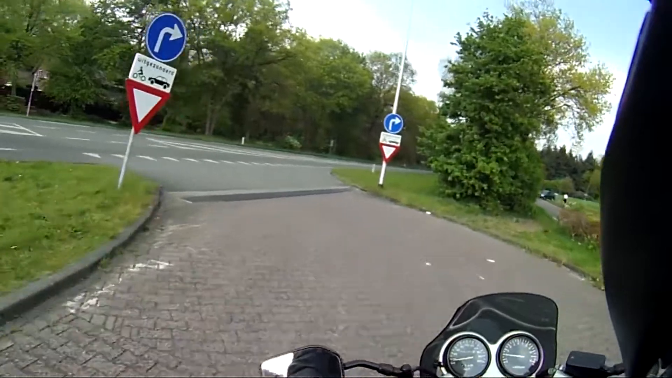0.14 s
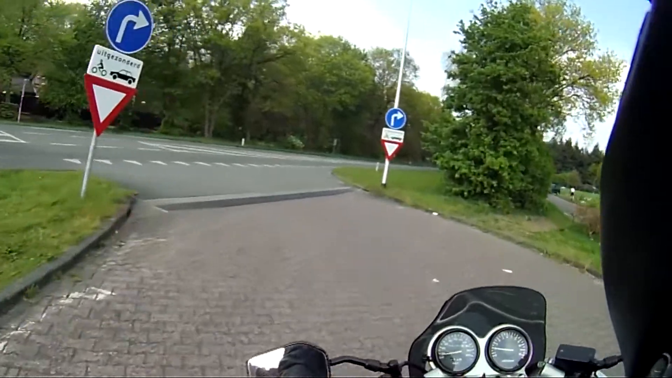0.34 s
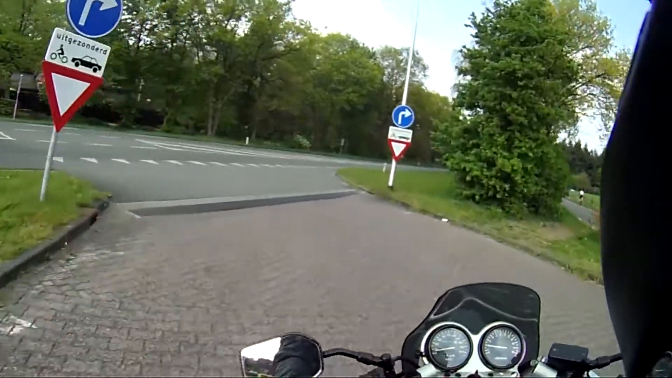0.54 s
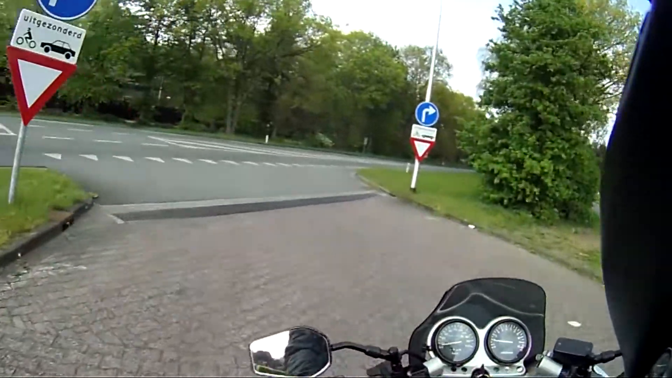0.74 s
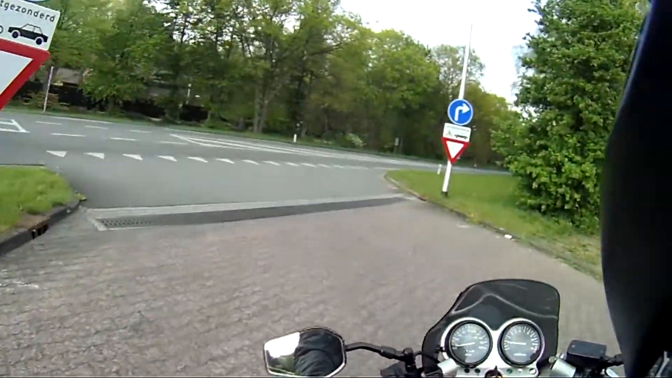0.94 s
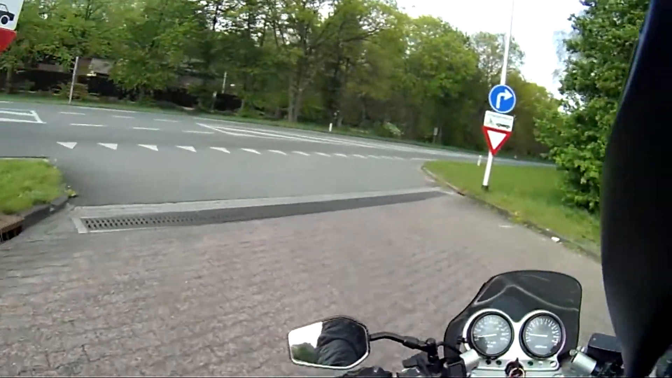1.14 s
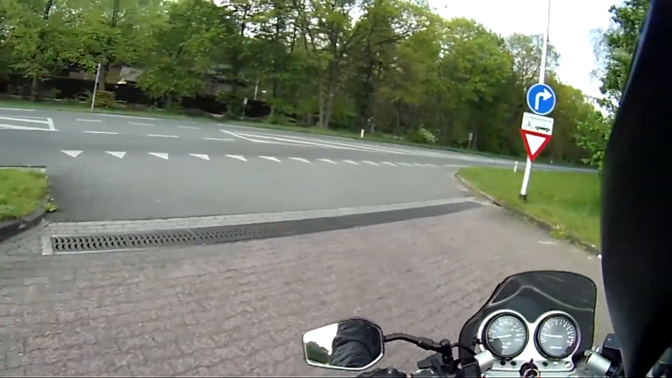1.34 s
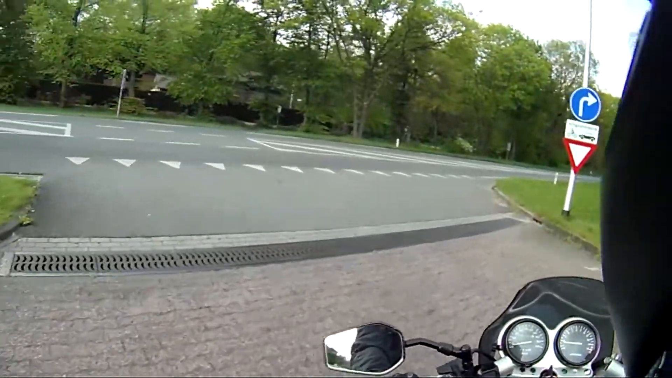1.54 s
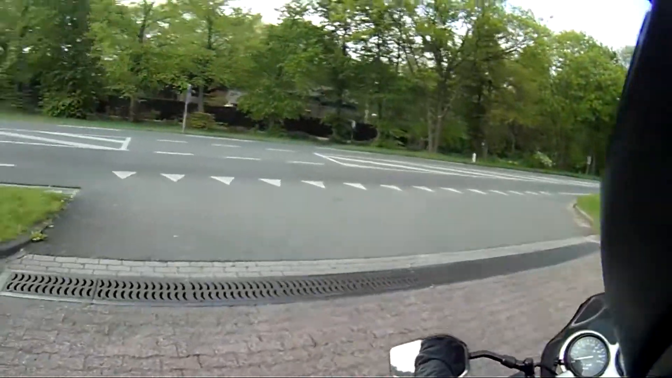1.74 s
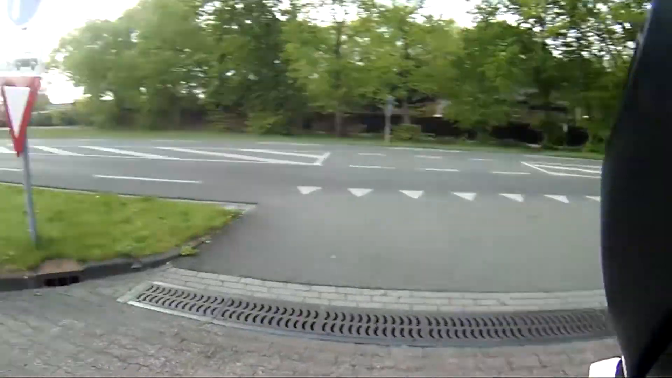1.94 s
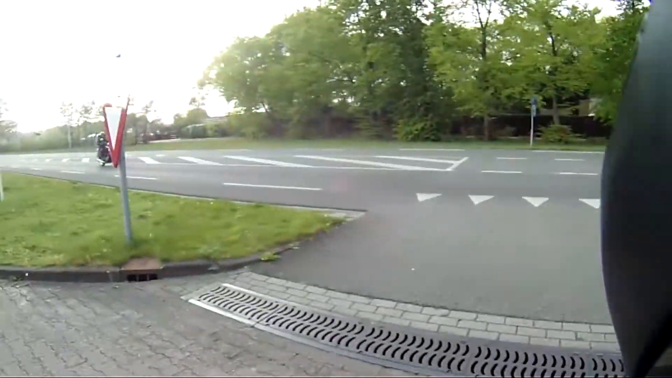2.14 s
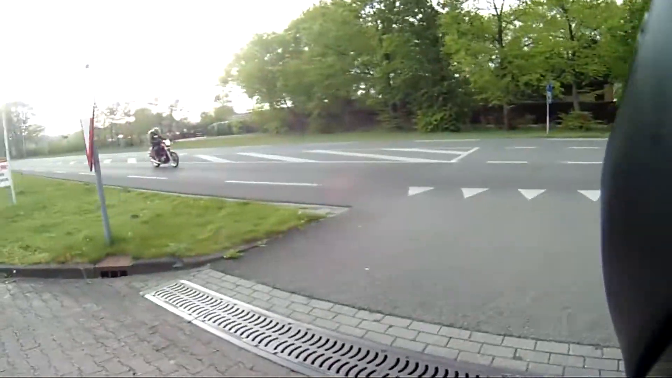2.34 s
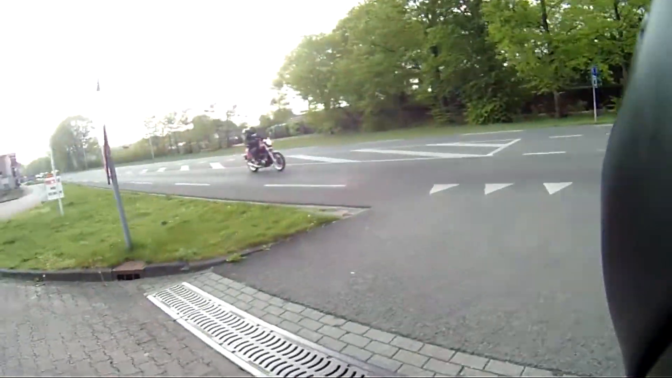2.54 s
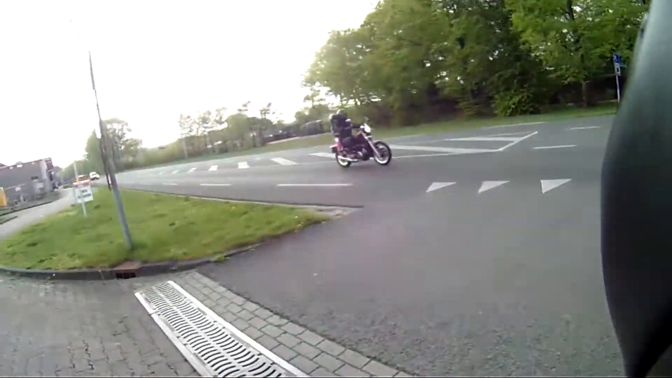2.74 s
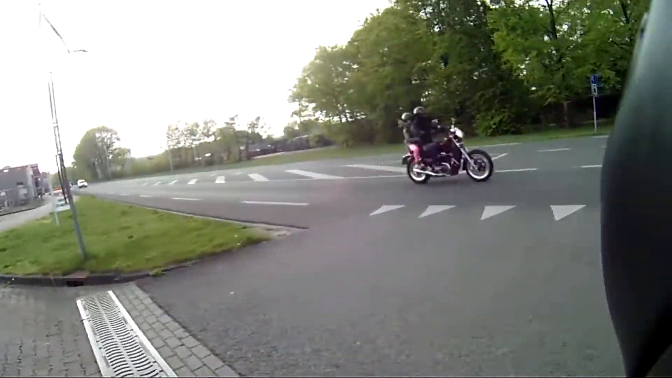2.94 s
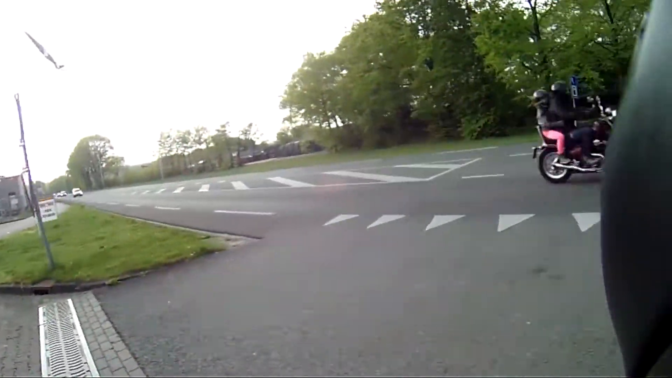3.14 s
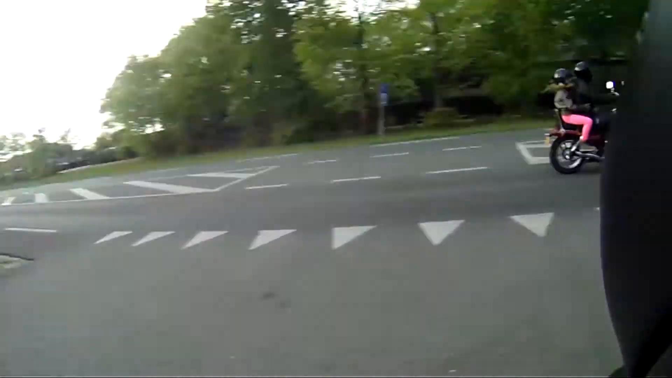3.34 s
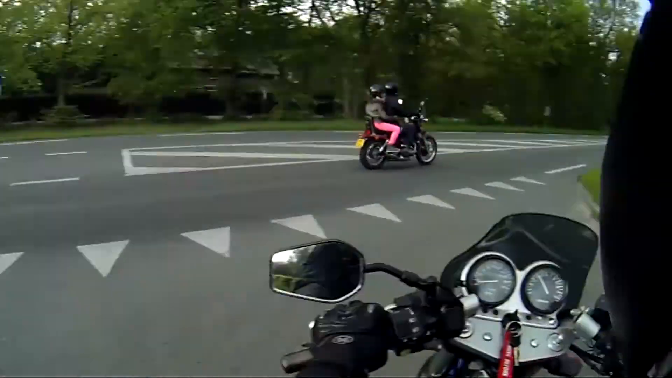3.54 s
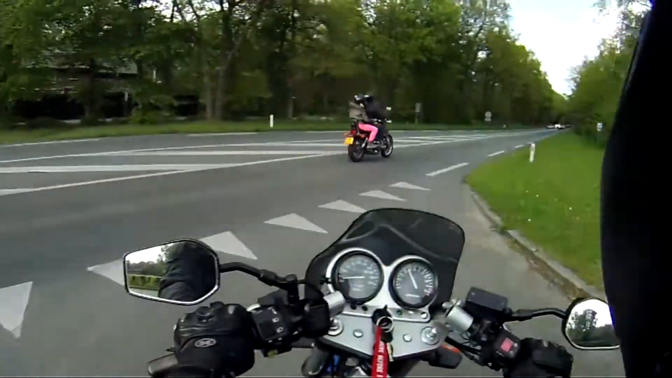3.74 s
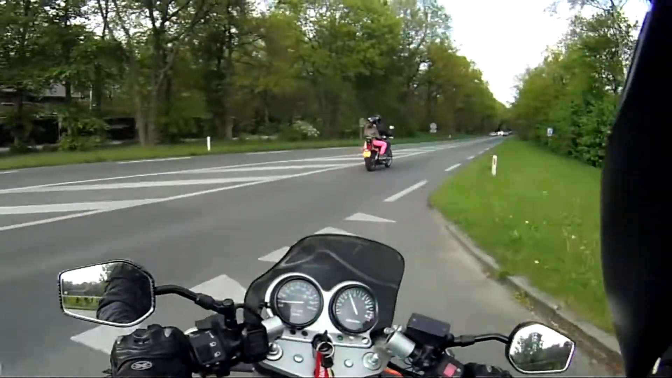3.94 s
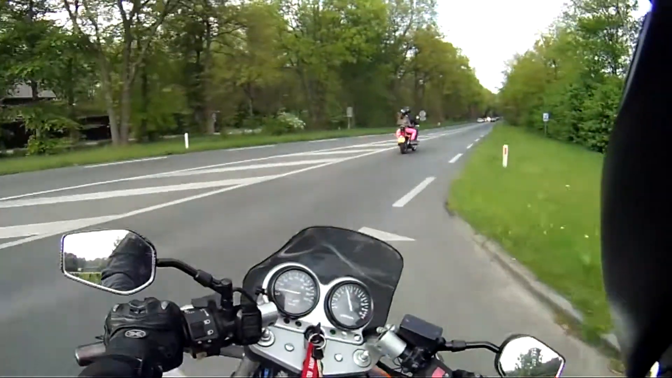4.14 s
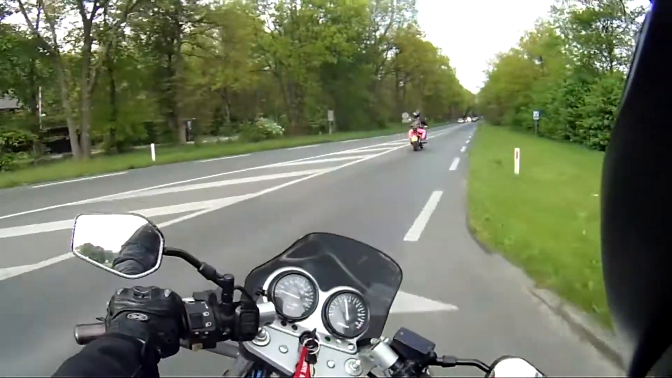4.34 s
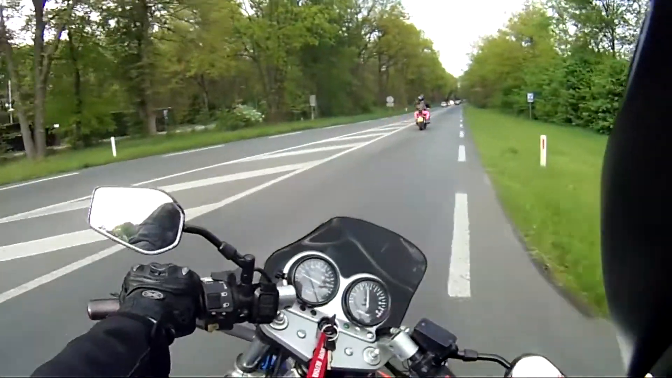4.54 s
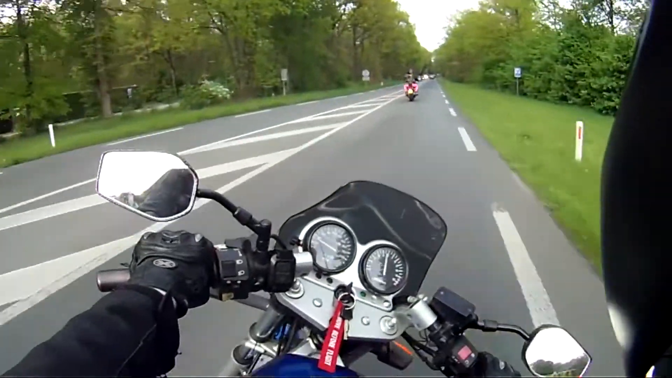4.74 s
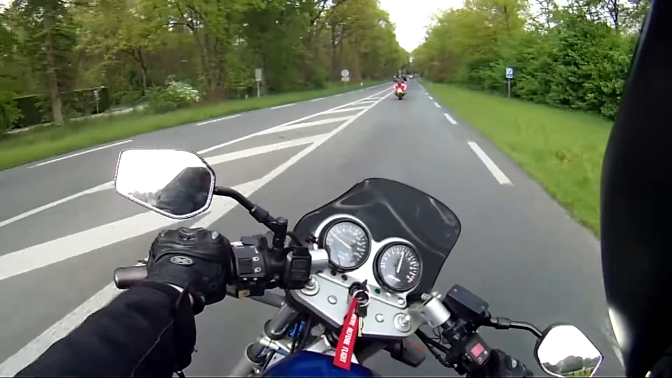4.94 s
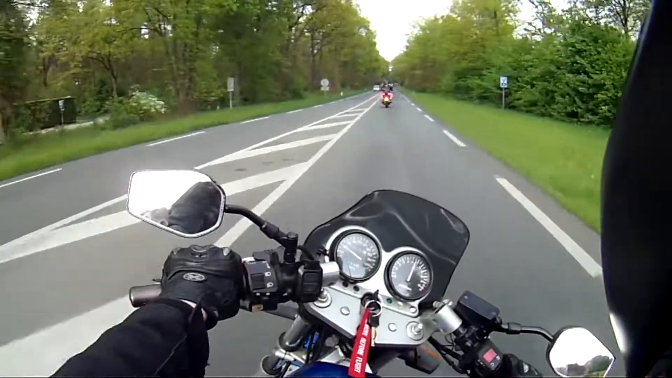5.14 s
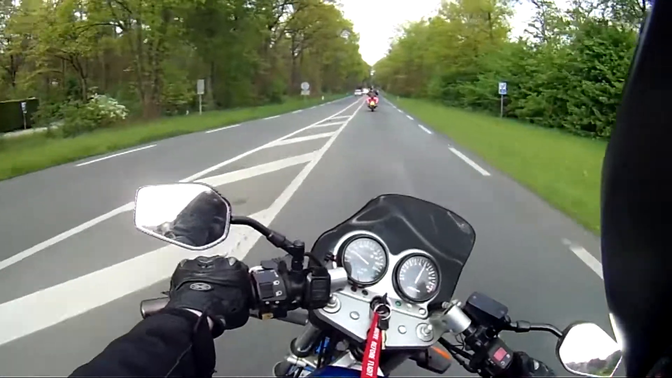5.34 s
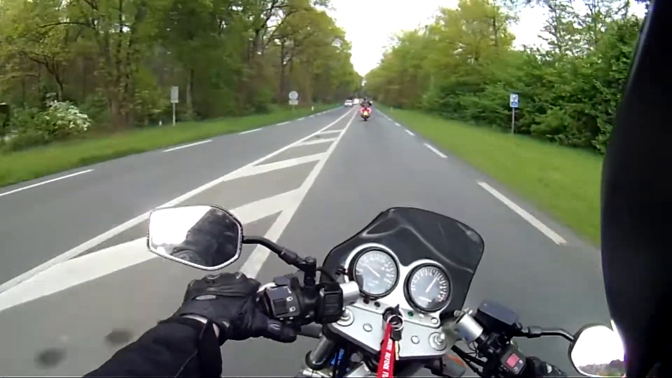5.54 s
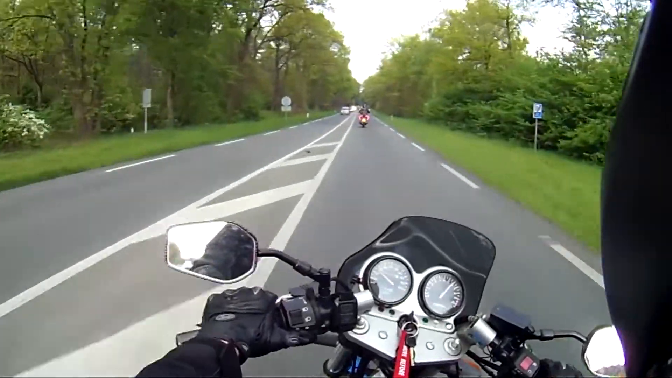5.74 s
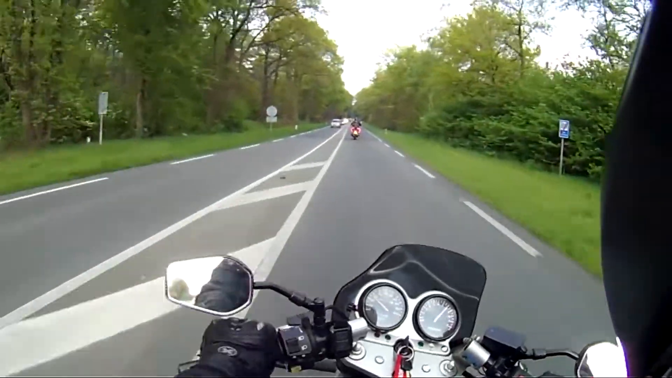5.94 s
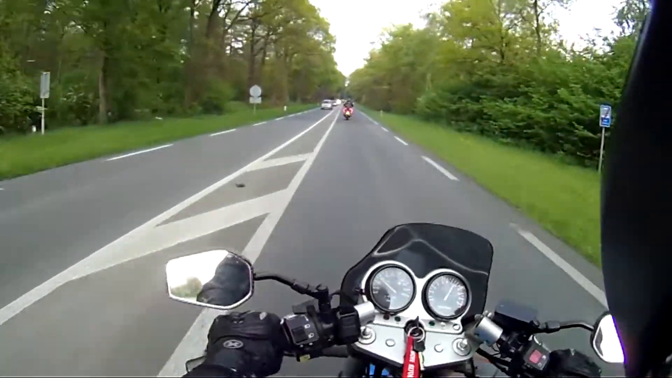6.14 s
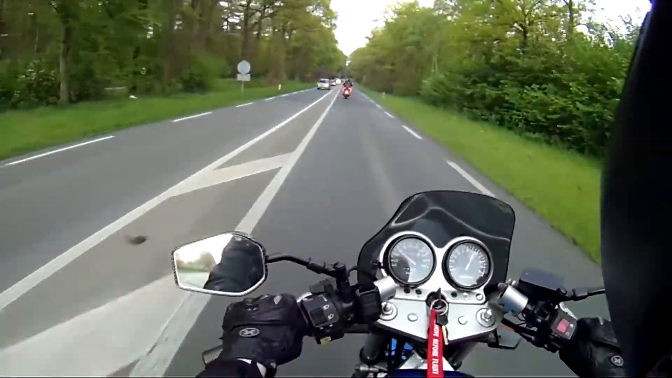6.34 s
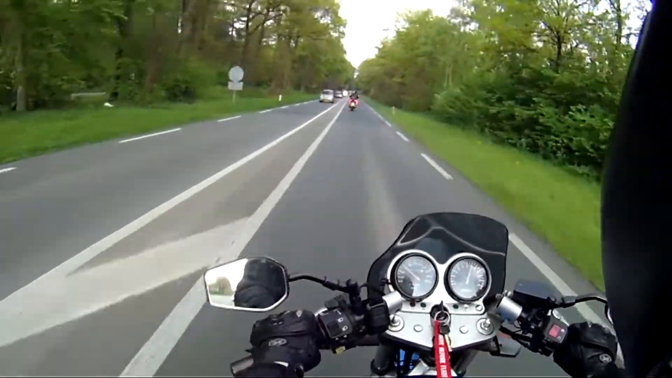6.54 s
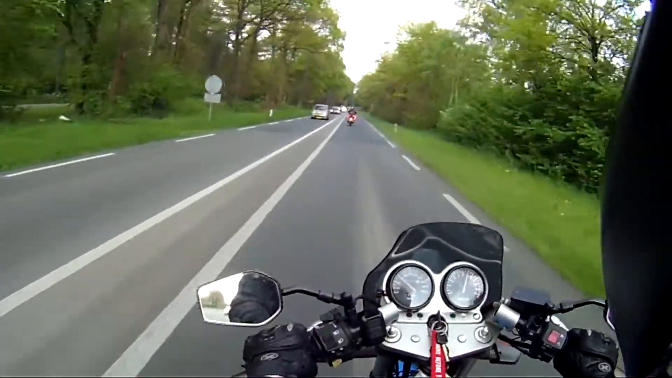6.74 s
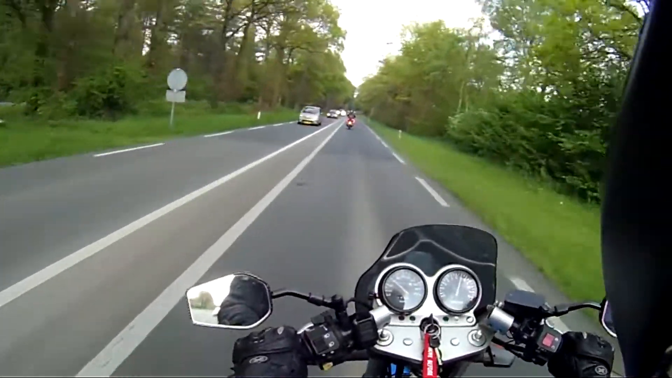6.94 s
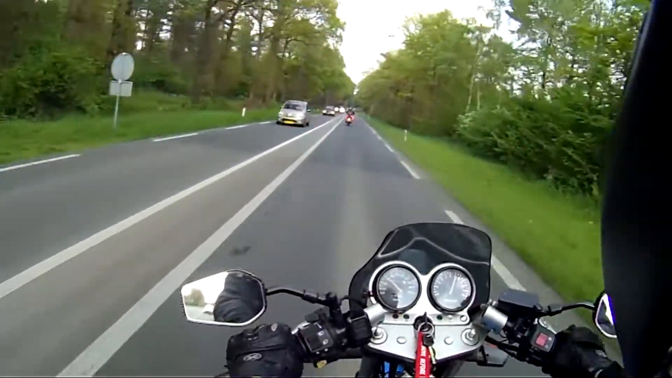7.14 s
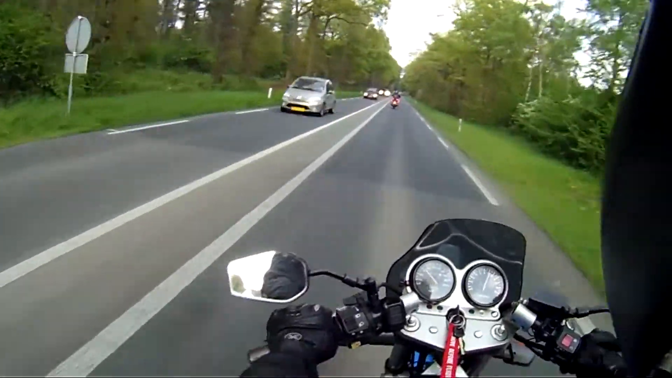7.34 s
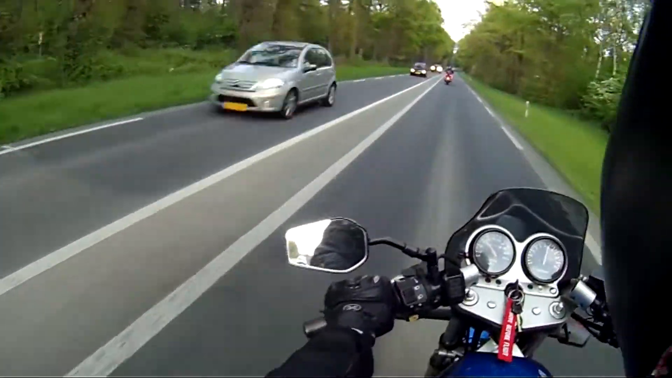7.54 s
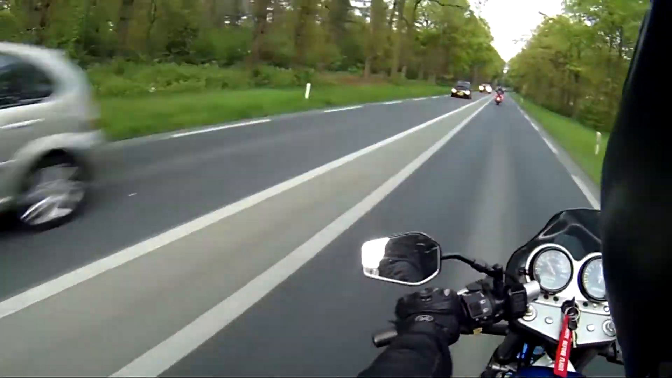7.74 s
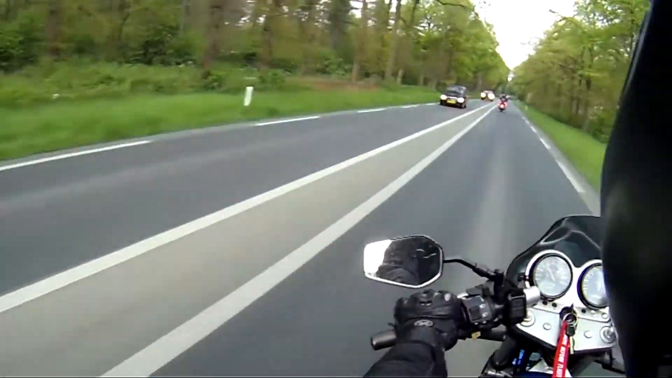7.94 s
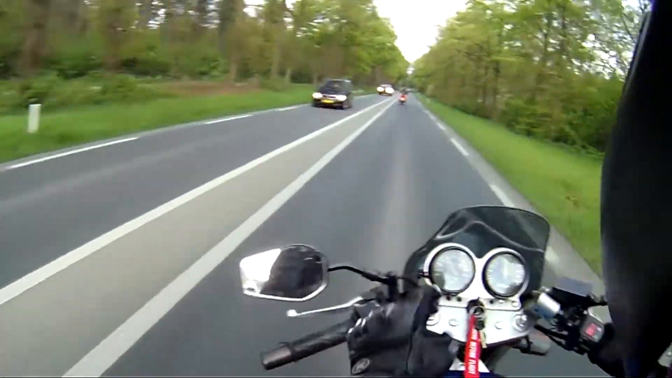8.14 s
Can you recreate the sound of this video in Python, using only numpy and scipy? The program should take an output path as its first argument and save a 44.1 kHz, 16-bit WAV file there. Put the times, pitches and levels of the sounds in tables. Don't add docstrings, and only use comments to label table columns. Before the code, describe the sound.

A loping, bassy idle knocks unevenly, with tiny lever ticks, a faint boot scuff and wheels rumbling over a grate. Then the throttle opens and the thumps fuse into a growl whose pitch rises strongly, falls at a shift, climbs less, falls again and settles. Mechanical hiss and low wind buffeting increase with speed. Close helmet microphone on an open road.

```python
import sys
import numpy as np
from scipy import signal
from scipy.io import wavfile
from scipy.ndimage import uniform_filter1d

SR = 44100
rng = np.random.default_rng(int(sys.argv[2]) if len(sys.argv) > 2 else 0)


def elevation(decibels):
    levels = np.asarray(decibels, float)
    return 10 ** (levels / 20)


def bounce(signal):
    frames = np.transpose(np.atleast_2d(signal))
    limited = np.clip(frames, -1, 1)
    pcm = np.round(limited * 32767).astype(np.int16)
    wavfile.write(sys.argv[1], SR, pcm)


N = 366024
TIME = np.arange(N) / SR

# time in seconds, firing cycles per second.
IDLE_REVS = [
    (0.0, 12.65),
    (0.199, 14.31),
    (0.488, 14.16),
    (0.649, 12.51),
    (1.832, 11.99),
    (2.574, 11.07),
    (2.699, 11.94),
    (2.865, 10.36),
    (3.032, 11.68),
]
# time in seconds, cycles per second.
RIDE_REVS = [(3.444, 39.2), (3.6, 38.2), (3.74, 37.6), (3.86, 37.8), (4.2, 38.8), (4.24, 38.2), (4.3, 36.1),
             (4.45, 39.7), (4.9, 48.5), (5.22, 54.1), (5.61, 60.4), (5.805, 63.15), (6.125, 49.2),
             (6.2, 54.8), (6.25, 55.4), (6.34, 54.2), (6.435, 47.2), (6.5, 48.7), (6.96, 53.5),
             (7.198, 55.52), (7.3, 50.75), (7.46, 45), (7.55, 46.8), (7.63, 42.7), (7.68, 43.5),
             (8.3, 45.5)]
# time in seconds, opening (0 shut, 0.4 eased, 0.7 part, 1 wide).
THROTTLE = [
    (3, 1),
    (5.835, 1),
    (5.87, 0),
    (6.14, 0),
    (6.18, .7),
    (7.2, .7),
    (7.24, 0),
    (7.45, 0),
    (7.5, .4),
    (8.3, .4),
]
# boom in dB at its strongest, bark in dB, hiss in dB.
LOAD = [(-17, -21.5, -42.5), (-11, -21, -41), (-11, -17, -41.5), (-9, -16.5, -41.5)]
# pitch in Hz, width in Hz, level in dB.
SILENCER = [
    (54.3, 9.9, 10),
    (92, 38, 5.5),
    (126, 17, -14),
    (244.7, 26, -8),
    (300, 21, -9),
    (420, 77, -40),
]
# time in seconds, level in dB.
HARD_FIRINGS = [
    (0.196, -4.5),
    (0.48, -1),
    (1.846, -4.5),
    (2.012, -10.5),
]
WIDE_HZ = [39.5, 45, 50.5, 56, 61]
PART_HZ = [49.2, 51.8, 54.5]
# multiple of the firing rate, dB with the clutch slipping, dB at each WIDE_HZ.
OPEN_TONES = [(2, -31, -32, -39, -32, -27, -26), (3, -24, -23, -25, -24, -24, -30),
              (4, -29, -29, -21, -21, -27, -22), (5, -32, -28, -28, -28, -25, -21),
              (6, -42, -41, -39, -35, -25, -21), (7, -28, -35, -40, -46, -32, -25),
              (8, -23, -30, -28, -28, -29, -31), (9, -27, -32, -27, -24, -27, -31),
              (10, -35, -36, -28, -26, -29, -33), (11, -33, -32, -34, -29, -31, -31),
              (12, -26, -26, -27, -32, -38, -33), (13, -26, -29, -34, -42, -42, -45),
              (14, -40, -39, -38, -41, -59, -41), (15, -52, -46, -46, -51, -44, -40),
              (16, -43, -49, -55, -51, -42, -35), (17, -41, -53, -54, -49, -44, -44),
              (18, -45, -54, -41, -62, -46, -42), (19, -55, -48, -50, -47, -49, -41),
              (20, -64, -57, -48, -49, -39, -45), (21, -56, -66, -55, -48, -50, -44),
              (22, -63, -52, -55, -57, -50, -55), (23, -58, -64, -59, -56, -49, -50),
              (24, -59, -52, -56, -57, -49, -53), (25, -48, -64, -54, -59, -51, -46),
              (26, -65, -57, -64, -55, -52, -58), (27, -63, -62, -71, -59, -56, -47),
              (28, -58, -72, -67, -65, -50, -53)]
# multiple of the firing rate, dB at each PART_HZ,
# then dB when eased, dB when shut in a low gear, dB when shut in top gear.
CLOSING_TONES = [(2, -34, -30, -25, -43, -45, -33), (3, -31, -32, -30, -31, -43, -30),
                 (4, -23, -25, -27, -28, -24, -25), (5, -24, -22, -18, -39, -21, -21),
                 (6, -25, -22, -22, -32, -29, -25), (7, -41, -51, -32, -29, -31, -38),
                 (8, -26, -32, -34, -28, -27, -35), (9, -27, -26, -31, -28, -32, -39),
                 (10, -32, -32, -36, -31, -35, -38), (11, -36, -30, -30, -39, -39, -42),
                 (12, -35, -36, -30, -42, -36, -47), (13, -46, -44, -45, -37, -41, -47),
                 (14, -55, -59, -54, -50, -50, -46), (15, -47, -50, -43, -55, -51, -50),
                 (16, -50, -56, -36, -48, -40, -49), (17, -51, -46, -43, -46, -58, -58),
                 (18, -51, -45, -41, -54, -47, -60), (19, -45, -41, -47, -53, -58, -47),
                 (20, -45, -46, -43, -51, -51, -53), (21, -52, -48, -49, -59, -51, -65),
                 (22, -54, -46, -53, -54, -54, -53), (23, -61, -50, -51, -55, -60, -53),
                 (24, -52, -66, -57, -56, -57, -56), (25, -56, -60, -55, -55, -56, -60),
                 (26, -60, -54, -63, -52, -68, -61), (27, -57, -68, -58, -54, -64, -69),
                 (28, -73, -64, -54, -61, -65, -62)]
# pitch in Hz, level in dB.
LAUNCH_PIPE = [(20, -36), (50, -31), (68, -17.5), (90, -19), (125, -30.5), (170, -30), (450, -29),
               (550, -47), (1100, -67)]
# pitch in Hz, level in dB per Hz.
HISS_COLOUR = [(60, -35), (250, -14), (600, -4), (800, -9.5), (1100, -15.5), (1450, -19), (2300, -31.5),
               (3050, -35.5), (5000, -48.5), (7000, -55.5), (9000, -60.5), (14000, -83)]
# pitch in Hz, width in Hz, lift in dB.
CASINGS = [(760, 140, -9), (920, 120, 4), (1700, 90, 8), (2140, 70, 6), (2520, 90, 4), (3520, 250, -2),
           (3950, 450, 6), (5000, 500, 5), (6350, 200, 4), (7500, 400, 6)]
# time in seconds, metres per second.
SPEED = [
    (0, 3.03),
    (2, 1.87),
    (3, 3.64),
    (4.2, 5.6),
    (4.7, 5.7),
    (5.3, 10),
    (5.9, 13),
    (6.6, 13.1),
    (7.2, 20.3),
    (8.3, 19.8),
]
# time in seconds, length in seconds, buffet lift in dB, roar lift in dB.
GUSTS = [
    (5.902, .2, 3, -1),
    (6.542, .1, 6, -1),
    (6.995, .23, 2, -1),
    (7.5, .2, -4, -4),
    (7.71, .08, -4, -6),
    (7.95, .2, 0, -3),
    (8.206, .14, 7, -2),
]
# pitch in Hz, level in dB per Hz.
BUFFET_COLOUR = [(6, -1), (18, -11), (35, 4.5), (60, -2.5), (100, -11.5), (200, -30), (500, -51.5),
                 (2000, -110)]
ROAR_COLOUR = [(40, -21), (100, 6), (200, -4.5), (400, -5.5), (600, -16.5), (800, -17), (2000, -41.5),
               (6000, -110)]
# pitch in Hz, level in dB per Hz.
PASS_COLOUR = [(100, -11.5), (400, -16), (750, 1.5), (1300, -10), (1800, -12), (2150, -25), (3500, -48.5),
               (8000, -77.5)]
# time in seconds, peak in dB, pitch in Hz.
TICKS = [(0.678, -58, 3300), (0.67, -62, 3000), (0.6, -63, 3300), (0.47, -64, 3000), (0.305, -64, 3200),
         (0.73, -64, 3200), (1.27, -64, 2900), (0.9264, -40, 800), (1.5424, -38, 650), (1.9225, -34, 750),
         (2.029, -36, 650), (2.5763, -33, 650), (2.825, -57, 4200), (2.8255, -43, 2000), (2.825, -39, 1200),
         (2.825, -34, 600), (2.031, -49, 2200), (2.031, -33, 300)]
# pitch in Hz, level in dB per Hz.
SCUFF_COLOUR = [(800, -17), (2000, -0.5), (4000, -8.5), (8000, -20.5), (12000, -39)]
# start in seconds, length in seconds, first pitch in Hz, last pitch in Hz, level in dB.
CHIRPS = [(0.057, .04, 4400, 5000, -78), (0.214, .035, 3700, 3030, -74), (.425, .05, 3750, 2625, -72),
          (.47, .025, 3000, 3700, -75), (0.545, .03, 3750, 3170, -71), (0.601, .04, 3200, 2610, -68),
          (0.667, .03, 2800, 3760, -65), (0.788, .03, 3650, 3300, -73), (0.84, .025, 2800, 3840, -73),
          (1.234, .045, 3450, 3710, -74), (1.267, 0.082, 3800, 4210, -76)]
# pitch in Hz, level in dB per Hz.
SELF_COLOUR = [(500, -5.5), (5000, -1), (9500, -3), (12000, -17), (15000, -33)]

START_TURN = .14
CATCH_S, SPIN_UP_S, SPIN_UP_SHAPE = 3.026, .182, 1.389
CLUTCH_HOME_S, TOP_GEAR_S = 4.3, 6.8
IDLE_DB, IDLE_SAG_DB_PER_HZ, IDLE_BRIGHT_DB_PER_HZ = -23.5, -0.09, 2
LOW_HZ, MIDDLE_HZ = 38, 47.5
BOOM_HZ, BOOM_WIDTH_HZ, BOOM_STEEP = 55.7, 23.5, 1.79
BARK_DB_PER_HZ, OVERRUN_S, OVERRUN_DB = 0.0768, 0.4, 3
HISS_DB_PER_HZ, IDLE_HISS_DB, HISS_BUILDS_S = 0.3657, -64.5, 0.78
FIRST_LEADS, FIRST_LOW, FIRST_HIGH = .243, .6, 1.2
RING_LAG = .62
BUFFET_DB, BUFFET_DB_PER_DOUBLING, ROAR_DB, ROAR_DB_PER_DOUBLING = -59.5, 9, -56.5, 8.5


def revs():
    since = np.maximum(TIME - CATCH_S, 0)
    caught = 1 - np.exp(-(since / SPIN_UP_S) ** SPIN_UP_SHAPE)
    return (1 - caught) * curves(IDLE_REVS)[0] + caught * curves(RIDE_REVS)[0]


def loudness(hz):
    throttle = curves(THROTTLE)[0]
    boom_db, bark_db, hiss_db = (np.interp(throttle, [0, .4, .7, 1], c) for c in np.transpose(LOAD))
    off_note_db = BOOM_STEEP * 10 * np.log10(1 + (2 * (hz - BOOM_HZ) / BOOM_WIDTH_HZ) ** 2)
    boom_db = boom_db - np.minimum(throttle / 0.47, 1) * off_note_db
    keep = np.exp(-1 / (OVERRUN_S * SR))
    recent_change = signal.lfilter([1, -1], [1, -keep], throttle - throttle[0])
    bark_db = bark_db - OVERRUN_DB * recent_change + BARK_DB_PER_HZ * (hz - MIDDLE_HZ)
    hiss_db = hiss_db + HISS_DB_PER_HZ * (hz - MIDDLE_HZ)
    caught = np.clip((TIME - CATCH_S) / HISS_BUILDS_S, 0, 1) ** 0.43
    return boom_db, bark_db, IDLE_HISS_DB + caught * (hiss_db - IDLE_HISS_DB)


def idle(turns, hz, lead=0.29, lead_db=-6, lag=0.38, soft_s=0.0033, early_knock=0.19, echo_s=0.01521, echo=0.65):
    firing = np.diff(np.floor(turns), prepend=0)
    early = np.diff(np.floor(turns + lead), prepend=0)
    uneven_db = [[2.0], [.6]] * rng.standard_normal((2, 400))
    early_strength, firing_strength = elevation(uneven_db)[:, (turns + .5).astype(int)]

    t = TIME[:SR // 4]
    modes = [elevation(db) * np.exp(-np.pi * width * t) * np.exp(2j * np.pi * pitch * t) for pitch, width, db in SILENCER]
    upper = sum(modes[1:])
    ring = (modes[0] * np.exp(-1j * lag) - upper).imag
    soft_ring = ring + (1 - early_knock) * upper.imag
    delay = round(echo_s * SR)
    ring[delay:] -= echo * sum(modes[3:]).imag[:-delay]

    firing = firing * firing_strength
    for s, db in HARD_FIRINGS:
        firing[round(s * SR)] += elevation(db)
    earlies = elevation(lead_db) * early * early_strength
    thumps = (signal.oaconvolve(firing, ring) + signal.oaconvolve(earlies, soft_ring))[:N]
    thumps[:len(ring) - 600] += ring[600:]
    soften = np.hanning(max(round(soft_s * SR), 3))
    thumps = np.convolve(np.r_[ring[300:600], thumps], soften)[300:][:N]
    knock = signal.sosfilt(signal.butter(N=2, Wn=100, btype="high", fs=SR, output="sos"), thumps)
    bright_db = IDLE_BRIGHT_DB_PER_HZ * np.clip(hz - 12, -2, 3)
    thumps = thumps + (elevation(bright_db) - 1) * knock
    fade = np.clip((3.1 - TIME) / 0.072, 0, 1)
    level = elevation(IDLE_DB + IDLE_SAG_DB_PER_HZ * (hz - 9.0))
    return level * fade * thumps / np.std(thumps[:3 * SR])


def exhaust(turns, hz, smear_ms=1.1, tilt=.15, late=0.1687, boom_delay=0.16, boom_lag=0.0078,
            waver_db=1.7, jitter=0.003):
    step = 6
    boom_db, bark_db, _ = loudness(hz)
    boom_db, bark_db, throttle = boom_db[::step], bark_db[::step], curves(THROTTLE)[0][::step]
    shut, eased, part, wide = between(throttle, [0, .4, .7, 1])
    turns = (turns + jitter * wander(1.1, count=1)[0])[::step]
    hz, t = hz[::step], TIME[::step]
    turns = turns - late * np.clip((hz - 26) / 12, 0, 1)
    launch = np.clip((37 - hz) / 5, 0, 1)
    first = np.interp(hz, [47.5, 50.5], [FIRST_LOW, FIRST_HIGH])
    pipe_hz, pipe_db = np.transpose(LAUNCH_PIPE)

    home = np.clip((t - CLUTCH_HOME_S) / 0.16 + 1, 0, 1)
    top_gear = t > TOP_GEAR_S
    wide_shares = wide * home * between(hz, WIDE_HZ)
    part_shares = part * between(hz, PART_HZ)
    shares = np.array([*wide_shares, *part_shares, eased, shut * ~top_gear, shut * top_gear])

    wavers = wander(3.88, count=30)
    scatter = rng.uniform(-0.68, .4, size=40)
    bark, power = 0, 1e-9
    for (k, slip_db, *wide_db), (_, *closing_db) in zip(OPEN_TONES, CLOSING_TONES):
        pair = 1 + first * np.exp(2j * np.pi * k * FIRST_LEADS)
        db = (1 - home) * slip_db + np.array(wide_db + closing_db) @ shares
        lone_db = np.interp(np.log(k * hz), np.log(pipe_hz), pipe_db) + 20 * np.log10(abs(pair) + 1e-3)
        db = db + launch * (lone_db - db)
        power = power + elevation(2 * db) / 2
        late_ms = smear_ms * k * hz / 200
        phase = k * (turns - hz * late_ms / 1000) + tilt
        phase = phase - launch * RING_LAG / (1 + (k * hz / 160) ** 4)
        phase = phase + scatter[int(k)] * np.clip((k * hz - 560) / 250, 0, 1)
        level = elevation(db + waver_db * wavers[int(k)][::step])
        bark = bark + level * np.cos(2 * np.pi * phase + np.angle(pair))
    boom_turns = turns - boom_delay - boom_lag * (hz - LOW_HZ)
    boom = np.sqrt(2) * np.cos(2 * np.pi * boom_turns)
    rise = np.clip((t - 3.06) / 0.026, 0, 1)
    growl = rise * (elevation(boom_db) * boom + elevation(bark_db) * bark / np.sqrt(power))
    return signal.resample_poly(growl, step, 1, window=("kaiser", 10))[:N]


def hiss(turns, hz, throb=0.18, late=0.14):
    raw = noise(HISS_COLOUR, patchy_db=1.0, lifts=CASINGS, size=1024)
    band = signal.sosfilt(signal.butter(N=4, Wn=[1000, 3500], btype="band", fs=SR, output="sos"), raw)
    puff = 1 + throb * np.cos(2 * np.pi * (turns - late))
    return elevation(loudness(hz)[2]) * puff * raw / np.std(band)


def wind():
    doublings = np.log2(np.maximum(curves(SPEED)[0], .1))
    gust_db, lull_db = sum(np.outer(db, swell(s, length, length)) for s, length, *db in GUSTS)
    buffet_db = BUFFET_DB + BUFFET_DB_PER_DOUBLING * doublings + gust_db
    roar_db = ROAR_DB + ROAR_DB_PER_DOUBLING * doublings + lull_db
    lumps = 1.6 * np.tanh(wander(6.0, count=1)[0] / 1.6)
    buffet = elevation(buffet_db + 4.2 * lumps) * evened(noise(BUFFET_COLOUR, patchy_db=-4.5, size=2048))
    roar = elevation(roar_db + 0.67 * lumps) * evened(noise(ROAR_COLOUR, patchy_db=.8))
    return buffet + roar


def passer():
    return elevation(-45) * swell(3.51, rise_s=0.99, fall_s=0.28) * evened(noise(PASS_COLOUR, patchy_db=.8))


def grate(pitch_hz=225):
    band = signal.butter(N=2, Wn=[pitch_hz * 0.43, pitch_hz * 1.87], btype="band", fs=SR, output="sos")
    bars = elevation(-45.5 + 2.5 * wander(40, count=1)[0])
    rumble = evened(signal.sosfilt(band, rng.standard_normal(N)))
    return swell(1.93, rise_s=0.24, fall_s=0.23) * bars * rumble


def ticks():
    out, t = np.zeros(N), TIME[:900]
    grit = rng.standard_normal((len(TICKS), 900))
    for (s, db, hz), g in zip(TICKS, grit):
        band = signal.butter(N=3, Wn=[hz * .55, hz * 1.6], btype="band", fs=SR, output="sos")
        strike = 5 * np.exp(-t / .0003) + g
        snap = signal.sosfilt(band, strike * np.exp(-t / 0.003) * np.minimum(t / .0004, 1))
        out[round(s * SR):][:900] += elevation(db) * snap / abs(snap).max()
    return out


def scuff():
    brush = evened(noise(SCUFF_COLOUR, patchy_db=1.5, size=512))
    return elevation(-66.5) * swell(2.07, rise_s=0.25, fall_s=0.049) * brush


def birds():
    out = np.zeros(N)
    for s, length, from_hz, to_hz, db in CHIRPS:
        n = round(length * SR)
        turns = np.cumsum(np.linspace(from_hz, to_hz, n)) / SR
        out[round(s * SR):][:n] += elevation(db) * np.hanning(n) * np.sin(2 * np.pi * turns)
    leaves = evened(uniform_filter1d(rng.standard_normal(N), size=45))
    return out * (.8 + .7 * leaves)


def noise(colour, patchy_db, lifts=(), size=1024):
    hz = np.fft.rfftfreq(size, 1 / SR)
    a, b, patches = rng.standard_normal((N * 4 // size + 5, len(hz), 3)).T
    patches = uniform_filter1d(patches, size=7, axis=0)
    patches = evened(uniform_filter1d(patches, size=14, axis=1))
    f, db = np.transpose(colour)
    shape_db = np.interp(np.log(hz + 1), np.log(f), db)
    shape_db = shape_db + sum(lift_db / (1 + (2 * (hz - c) / w) ** 2) for c, w, lift_db in lifts)
    z = (a + 1j * b) * elevation(shape_db[:, None] + patchy_db * patches)
    return signal.istft(z, nperseg=size, noverlap=size * 3 // 4)[1][:N]


def wander(hz, count):
    steps = rng.standard_normal((count, 4000))
    steps = signal.lfilter(*signal.butter(N=2, Wn=np.clip(hz, .1, 200), fs=4000 * SR / N), steps)
    return [np.interp(TIME, np.linspace(0, N / SR, 4000), evened(row)) for row in steps]


def swell(s, rise_s, fall_s):
    return np.exp(-((TIME - s) / np.where(TIME < s, rise_s, fall_s)) ** 2)


def curves(rows):
    s, *columns = np.transpose(rows)
    return [np.interp(TIME, s, c) for c in columns]


def between(value, stations):
    return np.array([np.interp(value, stations, row) for row in np.eye(len(stations))])


def evened(x):
    return x / np.sqrt(np.mean(x ** 2) + 1e-20)


def scene():
    hz = revs()
    turns = START_TURN + np.cumsum(hz) / SR
    engine = idle(turns, hz) + exhaust(turns, hz) + hiss(turns, hz)
    around = wind() + passer() + grate() + ticks() + scuff() + birds()
    return (engine + around)[None]


def top_cut(x):
    return signal.sosfilt(signal.butter(12, 14190, fs=SR, output="sos"), x)


def record(dry):
    dry = dry + elevation(-81) * evened(noise(SELF_COLOUR, patchy_db=-1.5, size=512))
    ceiling, knee = .715, 24
    limited = dry / (1 + abs(dry / ceiling) ** knee) ** (1 / knee)
    return top_cut(limited)


dry = scene()
out = record(dry)
bounce(out)
```